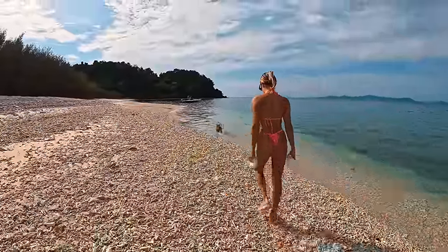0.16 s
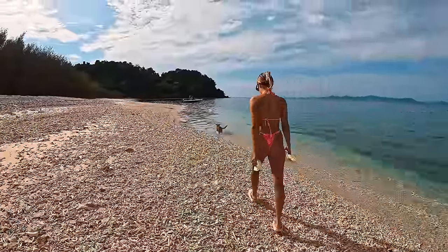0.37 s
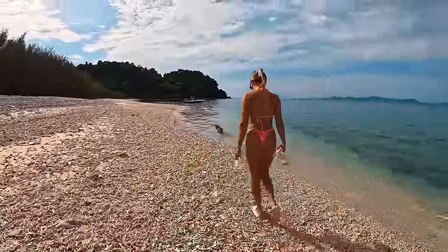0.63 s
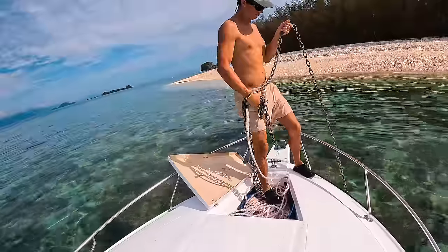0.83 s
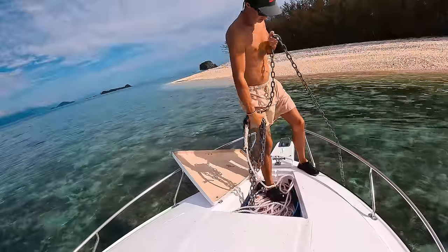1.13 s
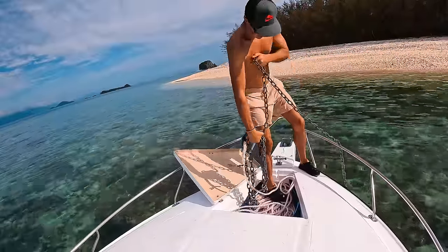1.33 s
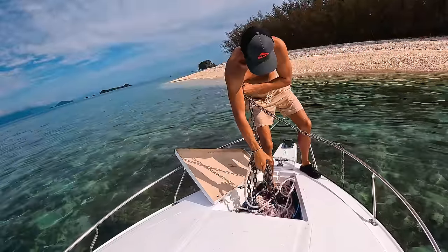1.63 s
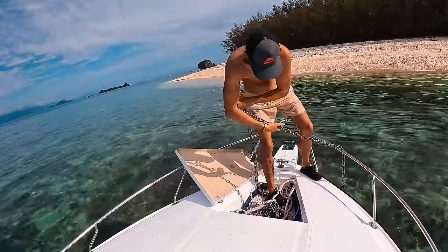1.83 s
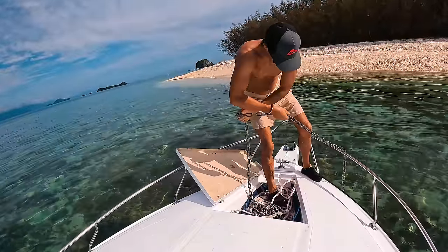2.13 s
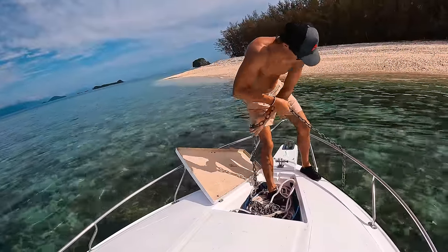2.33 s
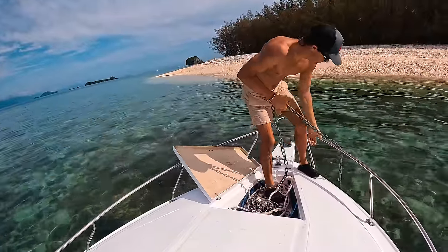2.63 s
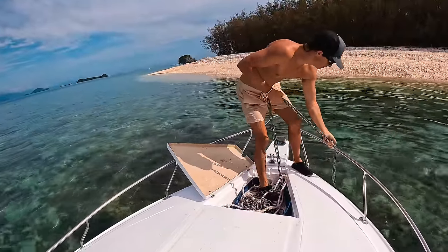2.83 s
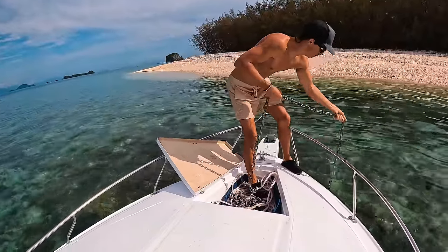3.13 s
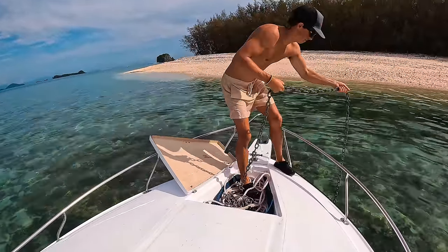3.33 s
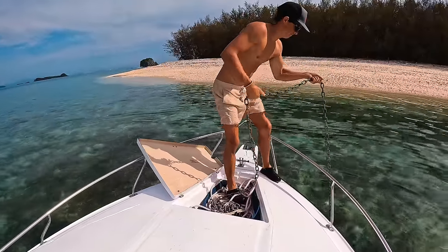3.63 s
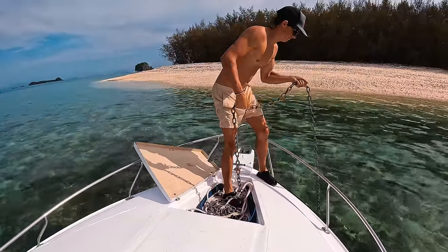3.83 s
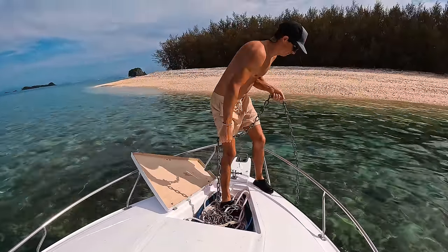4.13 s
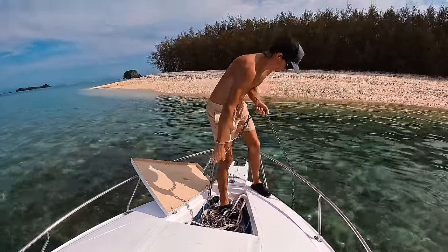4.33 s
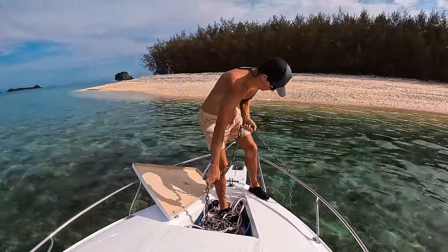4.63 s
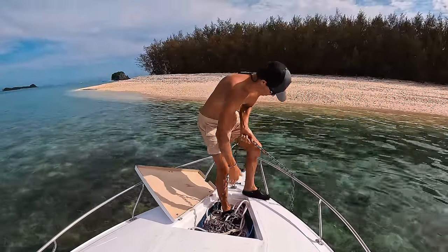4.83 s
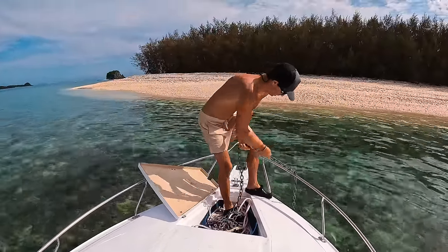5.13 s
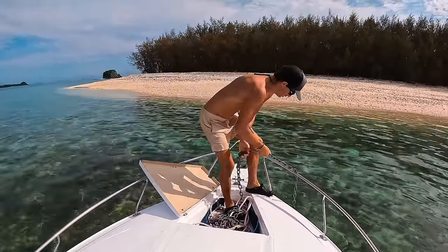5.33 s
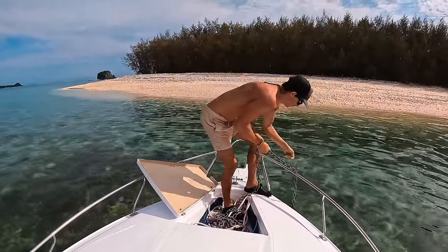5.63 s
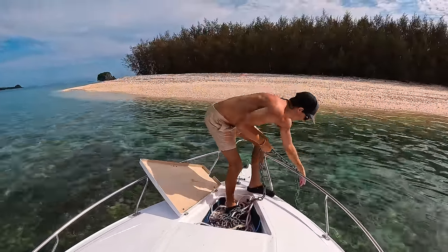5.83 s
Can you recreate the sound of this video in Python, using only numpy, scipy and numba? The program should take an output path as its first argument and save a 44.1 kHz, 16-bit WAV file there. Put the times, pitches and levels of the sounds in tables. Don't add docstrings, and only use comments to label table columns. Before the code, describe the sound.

Soft steps crunch on a pebble beach with small waves, cut by a tiny silence. Then, close by on a boat, a steel chain clinks, pours in a dense rattle around two seconds and knocks into the well. Sparser clinks follow, then set-down knocks, squeaking soles and another pull ending in hard deck blows. Water laps and wind bumps one small, nearly mono microphone outdoors.

```python
import sys
import numpy as np
from scipy import signal
from scipy.fft import rfft, irfft
from scipy.io import wavfile
from scipy.ndimage import uniform_filter1d, minimum_filter1d
from numba import njit

SR = 44100
rng = np.random.default_rng(int(sys.argv[2]) if len(sys.argv) > 2 else 0)


def invert_db(x):
    u = np.asarray(x, float) / 20
    return 10 ** u


def wav_out(sig):
    wavfile.write(sys.argv[1], SR, np.round(np.clip(np.atleast_2d(sig).T, -1, 1) * 32767).astype(np.int16))


N = 263628
T = np.arange(N) / SR
CUT_S, BACK_S, FADE_S = .769, 0.841, 0.097

# [f/Hz, level/dB per Hz]
SHORE_COLOUR = [(24, -37), (40, -7), (71, -12), (133, -18.5), (674, -20), (3590, -25), (5360, -34),
                (8620, -29), (15700, -51)]
# [f/Hz, level/dB per Hz]
WATER_COLOUR = [(40, 0), (60, -8.5), (100, -16.5), (250, -20.5), (500, -11.5), (1200, -11.5), (2300, -15.5),
                (5000, -23.5), (10000, -29.5), (15700, -37)]
# [start t/s, hold t/s, level/dB over calm water]
LAPS = [
    (.85, 0.012, 10.5),
    (1.1, .05, 0.4),
    (2.5, .15, 2),
    (3.62, .12, 4),
    (5, 0.06, 4.5),
    (5.4, .1, 2.5),
]
# [start t/s, hold t/s, heave level/dB, rumble level/dB]
GUSTS = [
    (0, .02, -28, -45),
    (0.496, 0.024, -21, -58),
    (1.864, .02, -28, -32.5),
    (3.25, .02, -20, -38),
    (3.31, 0.03, -16.5, -37),
    (3.489, .02, -24, -57),
    (4.228, 0.017, -30.5, -44.5),
    (4.698, 0.016, -28, -48),
]
# [start t/s, hold t/s, low crunch level/dB, high crunch level/dB]
STEPS = [
    (0, .01, -49, -54),
    (0.281, .01, -47.5, -48),
    (0.364, .01, -43.5, -46),
    (0.445, 0.0093, -44.5, -42),
    (0.56, 0.028, -48.5, -48.5),
    (0.757, .008, -48, -53),
]
# [t/s, peak level/dB, f/Hz]
PEBBLES = [
    (0.2732, -45, 7160),
    (0.3066, -21, 15100),
    (0.3545, -49, 8660),
    (0.3679, -30, 10000),
    (0.5585, -30.5, 7070),
    (0.6763, -35, 12500),
    (0.757, -28, 1170),
    (0.759, -32, 1950),
]

# [start t/s, length t/s, from f/Hz, to f/Hz, level/dB]
SQUEAKS = [(4.63, .012, 1590, 2600, -52), (4.685, .018, 2350, 2700, -44), (4.69, .03, 1500, 1550, -47),
           (4.74, .016, 1550, 1700, -47), (4.695, .03, 5600, 5400, -50), (4.638, .021, 5300, 5270, -40),
           (4.657, .013, 5300, 7600, -42), (4.64, .016, 2600, 2780, -48), (4.654, .013, 2750, 3150, -36),
           (4.667, .016, 2950, 3400, -39), (4.665, .014, 5700, 7000, -47), (4.71, .045, 3430, 3800, -44),
           (4.722, .017, 3950, 4480, -43), (4.734, .019, 4480, 3950, -42), (4.749, .018, 3950, 3900, -39),
           (4.695, .03, 6400, 7200, -47), (4.788, .038, 3780, 2880, -40), (4.82, .021, 2900, 2950, -43),
           (4.836, .027, 3180, 2500, -39), (4.85, .03, 2450, 1700, -37), (4.672, .014, 2250, 2350, -45),
           (4.712, .016, 1800, 2040, -41), (4.725, .03, 1650, 1750, -44), (4.772, .026, 2500, 2450, -42),
           (4.775, .024, 2100, 2100, -42), (4.822, .016, 5800, 5900, -45), (4.842, .014, 6100, 5600, -44),
           (4.825, .02, 1750, 1700, -48), (5.09, 0.035, 1500, 1750, -50), (5.128, 0.028, 2000, 1800, -44),
           (5.145, .027, 1600, 1580, -47), (5.093, .05, 2450, 2450, -52), (5.12, .016, 5050, 5100, -48),
           (5.16, .03, 3200, 3300, -51)]
# [start t/s, hold t/s, level/dB]
SCUFFS = [
    (4.665, 0.2, -39),
    (5.095, 0.03, -43),
    (5.115, 0.04, -37),
    (5.16, .02, -52),
]

# [t/s, peak level/dB]
BRUSHES = [(4.123, -46), (4.16, -48), (5.041, -42), (5.062, -42), (5.099, -44), (5.176, -42), (5.185, -42),
           (5.201, -44), (5.215, -41), (5.223, -43), (5.232, -42), (5.503, -42), (5.546, -45), (5.641, -47)]
# [f/Hz, level/dB per Hz]
BRUSH_COLOUR = [(1200, -20), (2200, -3), (4500, 0), (8000, -4), (11000, -10), (15500, -20)]

# [t/s, peak level/dB, centre f/Hz, t60 t/s]
WELL = [(2.1008, -24.5, 2310, 0.066), (2.1978, -5.5, 1563, 0.021), (2.2167, -17, 1540, 0.021),
        (2.2271, -13.5, 1540, 0.011), (2.2379, -27, 1550, 0.014), (2.2522, -30.5, 1010, 0.073),
        (2.2869, -11.5, 1650, 0.021), (2.3441, -13.5, 1613, 0.017), (2.9648, -36, 1240, 0.05),
        (2.98, -35, 1960, 0.06), (4.057, -17, 3720, 0.014), (4.2682, -26.5, 1250, 0.081)]
# [t/s, peak level/dB, centre f/Hz, t60 t/s]
BLOWS = [(0.8928, -24.5, 1160, 0.082), (4.0397, -11.5, 3010, 0.031), (4.047, -17.5, 2030, .035),
         (5.5778, -34, 1920, 0.092), (5.7219, -4, 1854, .027), (5.736, -16, 1680, 0.016),
         (5.7495, -9.5, 1300, 0.029), (5.7939, -11.5, 2420, 0.019), (5.8005, -16, 1990, 0.039),
         (5.82, -29, 1900, 0.03), (5.825, -25, 1290, 0.034), (5.835, -30, 1900, 0.03),
         (5.855, -32, 1900, 0.03)]
# [t/s, peak level/dB]
TAPS = [(2.8932, -37), (3.6592, -34), (3.675, -29), (3.6931, -26), (4.962, -34), (5.6306, -35),
        (5.659, -35), (5.6746, -35), (5.6953, -34), (5.8452, -31), (5.881, -33), (5.91, -35.5),
        (5.9494, -34.5)]
# [t/s, peak level/dB, t60 t/s]
THUDS = [
    (1.853, -35, 0.079),
    (1.871, -36, 0.035),
    (1.895, -50, 0.037),
    (2.971, -47, 0.13),
    (4.038, -34, 0.18),
    (4.54, -43, 0.15),
    (5.723, -42, 0.2),
]
# [f/Hz, level/dB per Hz]
SLAP_COLOUR = [(250, -12), (650, -3), (1800, 2.5), (4000, -4.5), (5500, -11), (7400, -15.5), (11000, -23),
               (15000, -36)]
# [f/Hz, level/dB, t60 t/s]
PANEL = [(940, -11, .035), (1170, -13, .03), (1520, -12, .025), (1740, -11, .022), (1940, -13, .03),
         (2470, -8.5, .025), (2900, -9, .02), (3500, -7.5, .022), (4050, -9, .02), (4900, -13, .018),
         (5750, -17, .018), (6200, -21, .022)]
# [f/Hz, level/dB, t60 t/s]
HULL = [(133, -2, 0.32), (173.3, 1.5, 0.085), (254, -1, 0.13), (332.7, -3.5, 0.21), (482, -2, 0.077)]
# [t/s, f/Hz, peak level/dB, t60 t/s]
STRUCK_RINGS = [(.893, 6800, -50.5, 0.28), (4.04, 6650, -38, 0.3), (4.05, 6705, -43, .25), (2.198, 860, -20, .025),
                (2.198, 3400, -18, .022), (2.965, 1250, -39, .05), (2.978, 620, -38, .04), (5.7497, 5750, -19, .02),
                (5.7497, 4950, -22, .025), (5.7222, 3950, -17, .02), (4.041, 3000, -21, .03),
                (4.175, 684, -27, .04), (4.539, 555, -28, .025), (4.041, 380, -24, .04), (.855, 3000, -46, .12),
                (3.24, 73, -24, .12)]
# [start t/s, hold t/s, level/dB]
MURMURS = [
    (1.83, 0.05, -37),
    (2.216, 0.06, -39),
    (2.98, .03, -51.5),
    (4.085, .03, -43),
    (4.67, 0.014, -47),
    (5.547, 0.09, -49),
]
# [f/Hz, level/dB per Hz]
HOLLOW_COLOUR = [(80, -14), (110, -0.5), (140, 0), (190, -4.5), (300, -9.5), (500, -17), (900, -20)]

# [t/s, ring peak level/dB, tick
# minus ring level/dB]
CLINKS = [(0.8715, -44, -3), (0.8885, -36, -2), (0.9665, -37, -2), (1.1128, -38, -11), (1.1712, -28, -14),
          (1.2126, -24, -17), (1.2181, -26, -12), (1.246, -21, -19), (1.263, -36, -1), (1.3004, -33, -7),
          (1.3163, -23, -19), (1.3468, -27, -12), (1.3555, -26, -16), (1.3682, -20, -13),
          (1.3832, -16, -16), (1.391, -10, -26), (1.4011, -23, -10), (1.407, -16, -27), (1.4116, -15, -17),
          (1.422, -22, -26), (1.431, -23, -24), (1.441, -19, -18), (1.4455, -16, -19), (1.455, -26, -10),
          (1.461, -27, -13), (1.477, -24, -22), (1.51, -28, -11), (1.5199, -14, -21), (1.5264, -13, -20),
          (1.532, -21, -25), (1.541, -27, -24), (1.5513, -31, -6), (1.566, -21, -18), (1.58, -29, -19),
          (1.6301, -23, -17), (1.6394, -17, -24), (1.644, -22, -17),
          (1.67, -26, -14), (1.682, -16, -20), (1.6888, -14, -19), (1.7089, -12, -20), (1.7162, -12, -27),
           (1.7299, -6, -22), (1.7345, -7, -21), (1.7651, -5, -25), (1.779, -9, -28), (1.7953, -11, -13),
           (1.811, -8, -17), (1.8279, -9, -28), (1.8387, -6, -19), (1.8564, -3, -23), (1.871, -8, -17),
           (1.879, -15, -19), (1.8923, -11, -21), (1.909, -11, -28), (1.916, -18, -28), (1.9926, -22, -24),
           (2.0613, -36, -9), (2.1, -43, 6), (2.186, -27, -15), (2.2088, -19, -28), (2.2504, -35, -7),
           (2.289, -23, -14), (2.3267, -22, -16),
          (2.445, -34, -12), (2.46, -38, -8), (2.4814, -27, -17), (2.497, -39, -8), (2.5173, -35, -11),
           (2.5281, -22, -24), (2.54, -38, -12), (2.5825, -21, -17), (2.62, -16, -18), (2.6739, -26, -22),
           (2.6989, -36, -10), (2.7527, -31, -12), (2.8143, -33, -13), (2.8216, -29, -10),
           (2.854, -32, -20), (2.876, -40, -8), (3.0481, -41, -6), (3.1309, -42, -1), (3.2007, -23, -14),
           (3.2756, -36, -12), (3.3135, -32, -13), (3.3178, -33, -24), (3.3509, -34, -12),
           (3.3723, -34, -14), (3.4077, -33, -11), (3.495, -35, -4), (3.5474, -39, -11), (3.5769, -24, -19),
           (3.8373, -48, 1),
          (3.9407, -22, -19), (3.9617, -22, -14), (3.9677, -18, -19), (3.978, -23, -20),
            (4.076, -20, -14), (4.1304, -37, -15), (4.2222, -33, -13), (4.2321, -29, -9),
            (4.2452, -23, -20), (4.2924, -14, -12), (4.325, -21, -18), (4.3413, -19, -14),
            (4.3501, -15, -23), (4.4062, -22, -22), (4.4526, -26, -10), (4.4995, -35, -6),
            (4.5279, -38, -7), (4.5459, -16, -27), (4.5933, -20, -16), (4.6252, -30, -10),
          (4.7582, -26, -16), (4.8006, -19, -15), (4.826, -24, -20), (4.851, -22, -20), (4.9629, -13, -12),
           (4.9756, -9, -27), (4.983, -12, -38), (4.9918, -18, -12), (5.0288, -30, -13), (4.999, -16, -22),
           (5.0477, -21, -16), (5.06, -36, -6), (5.0886, -41, -2), (5.2972, -40, -9), (5.3156, -33, -9),
           (5.373, -24, -17), (5.3777, -18, -31), (5.3866, -21, -20), (5.3979, -32, -2), (5.4104, -23, -12),
           (5.4323, -19, -11), (5.4583, -15, -17), (5.49, -31, -7), (5.5241, -20, -16), (5.5551, -31, -12),
           (5.5725, -21, -20), (5.6639, -38, -19), (5.7266, -9, -18), (5.736, -18, -16), (5.7497, -10, -10),
           (5.769, -11, -33), (5.776, -20, -15), (5.7982, -19, -17), (5.817, -28, -12)]
# [t/s, ring peak level/dB, tick minus ring level/dB]
JOLTS = [
    (4.04, -20, 3),
    (4.2709, -24, -4),
    (2.1965, -34, 6),
]
# [t/s, ring peak level/dB, tick minus ring level/dB]
CHOKED = [
    (4.8362, -13, -26),
    (5.2408, -31, -11),
    (5.4773, -6, -23),
    (4.3184, -13, -15),
]
# [start t/s, hold t/s, ring level/dB, dry patter minus ring level/dB]
SWINGS = [(1.177, 0.14, -42.5, -14), (1.376, 0.09, -31, -20), (1.515, 0.025, -32, -20),
          (1.645, .04, -31, -19), (1.705, .02, -26, -20), (1.735, 0.065, -18.5, -23),
          (1.82, 0.05, -17.5, -19), (1.87, 0.025, -19, -21), (1.92, 0.07, -28, -24), (2.223, .11, -35, -22),
          (2.482, 0.018, -38.5, -17), (2.708, .16, -55, -14), (3.975, 0.0073, -38, -18),
          (4.05, 0.025, -38, -9), (4.297, 0.055, -28, -18), (4.555, 0.08, -35, -18),
          (4.816, 0.016, -31.5, -14), (4.975, 0.025, -28, -15), (5.4, 0.06, -29, -21),
          (5.755, 0.04, -28, -22)]
# [f/Hz, spread between links f/Hz, level/dB, t60 t/s]
LINK = [(11670, 85, 0, .085), (12225, 60, -4.5, .08), (12505, 50, -8, .065)]
# [f/Hz, level/dB per Hz]
TICK_COLOUR = [(1200, -55), (2000, -17), (4350, -11), (8400, -5.5), (11000, 0), (12800, -13), (13500, -5.5),
               (15800, -19)]

# [low f/Hz, high f/Hz]
TREBLE_BANDS = [(12800, 13700), (13700, 14800), (14800, 17000)]


def noise(spectrum):
    hz, db = np.transpose(spectrum)
    log_hz = np.log(np.arange(1, N // 2 + 2) * SR / N)
    colour = invert_db(np.interp(log_hz, np.log(hz), db, -90, -90))
    x = irfft(rfft(rng.standard_normal(N)) * colour, N)
    return x / np.std(x)


def walk(rate):
    k = int(SR / rate)
    held = np.repeat(rng.standard_normal(N // k + 1), k)
    return 2.93 * uniform_filter1d(held, k)[:N]


def swells(s, hold, db, rise_db_s, fall_db_s, rest_db):
    early = np.clip(s[:, None] - T, 0, None)
    late = np.clip(T - (s + hold)[:, None], 0, None)
    level = db[:, None] - rise_db_s * early - fall_db_s * late
    return np.maximum(rest_db, np.max(level, axis=0))


@njit
def ring(s, hz, size, t60, phase, contact_s):
    out, push = np.zeros(N), np.exp(-1 / (contact_s * SR))
    for k in range(len(s)):
        turn = np.exp(2j * np.pi * hz[k] / SR - np.log(1000) / (t60[k] * SR))
        z, start, left = size[k] * np.exp(1j * phase[k]), int(s[k] * SR), 1.
        for i in range(start, min(N, start + int(t60[k] * SR))):
            left *= push
            out[i] += z.imag * (1 - left)
            z *= turn
    return out


def strike(s, hz, db, t60, contact_s, phase=0):
    same = 0.0 * s
    return ring(s, hz + same, invert_db(db + same), t60 + same, phase + same, contact_s)


def bursts(s, db, t60, contact_s=0.000067):
    return strike(s, 0, db, t60, contact_s, phase=np.pi / 2)


def shower(count, scatter_db):
    return rng.uniform(0, T[-1], count), scatter_db * (rng.exponential(size=count) - 1)


def wind():
    s, hold, heave_db, rumble_db = np.transpose(GUSTS)
    heave_db = swells(s, hold, heave_db, 76, 42.5, rest_db=-37)
    rumble_db = swells(s, 0 * s, rumble_db, 100, 70, rest_db=-54.5)
    heave = noise([(3, -3.5), (6, 0), (12, 0.5), (19, -2), (26, -23.5)])
    rumble = noise([(22, 2), (30, 4.5), (50, -5.5), (90, -7.0), (150, -14.5)])
    return invert_db(heave_db) * heave + invert_db(rumble_db) * rumble


def water():
    lap = invert_db(-49 - 6.5 + swells(*np.transpose(LAPS), 9.4, 26, 0))
    slow = invert_db(0.25 * walk(9)) * noise(WATER_COLOUR)
    fast = invert_db(1.2 * walk(25) - 2.2) * noise(WATER_COLOUR)
    return lap * (slow + fast)


def beach():
    s, hold, low_db, high_db = np.transpose(STEPS)
    low_db = swells(s, hold, low_db, 120, 81, -55.5)
    high_db = swells(s, hold, high_db, 250, 113, -59.5)
    grains = bursts(*shower(count=9000, scatter_db=3.5), 0.016)
    grains = grains / np.std(grains) * 0.4
    low = invert_db(low_db) * noise([(200, 0.5), (600, 1.5), (2000, -3.5), (5000, -19)])
    high = invert_db(high_db) * noise([(3000, -12), (7000, -6.0), (15700, -11)])
    s, db, hz = np.transpose(PEBBLES)
    pebbles = strike(s, hz, db - 7.5, t60=0.036, contact_s=0.00031)
    return grains * (low + high) + pebbles + invert_db(-52) * noise(SHORE_COLOUR)


def squeaks():
    out, waver, flutter = np.zeros(N), walk(150), walk(500)
    for k, (start, length, from_hz, to_hz, db) in enumerate(SQUEAKS):
        i = np.arange(int(start * SR), int((start + length) * SR))
        u = (T[i] - start) / length
        own = i - 4000 * k
        hz = (from_hz + (to_hz - from_hz) * u) * (1 + 0.006 * waver[own])
        phase = 2 * np.pi * np.cumsum(hz) / SR
        tone = np.sin(phase) + invert_db(-10.5) * (np.sin(2 * phase) + 0.66 * np.sin(3 * phase))
        chatter = np.clip((2500 - from_hz) / 900, .15, .8) * flutter[own]
        out[i] += invert_db(db) * (1 + chatter) * np.abs(np.sin(np.pi * u)) ** .5 * tone
    return out


def soles():
    db = swells(*np.transpose(SCUFFS), 800, 260, -71)
    s, size_db = shower(count=5000, scatter_db=2.5)
    rib_hz = 1400 * np.exp(rng.uniform(0, 1.7, len(s)))
    ribs = strike(s, rib_hz, size_db + np.interp(s, T, db) - 7, t60=0.022, contact_s=0.0017)
    rasp = noise([(1000, -7), (1500, 2.0), (4000, -2.0), (9000, -6), (15500, -24)])
    return squeaks() + ribs + invert_db(db - 5 + 0.72 * walk(120)) * rasp


def brushes():
    s, db = np.transpose(BRUSHES + [(s, db - 13) for s, db in TAPS])
    return bursts(s, db, .03, contact_s=.0012) * noise(BRUSH_COLOUR)


def hull():
    thuds = bursts(*np.transpose(THUDS))
    thuds = thuds * noise([(60, 0.0), (150, -5), (400, -2.5), (900, -11.5), (2500, -28.5)])
    s, hz, db, t60 = np.transpose(STRUCK_RINGS)
    struck = strike(s, hz, db, t60, contact_s=0.0016)
    murmur_db = swells(*np.transpose(MURMURS), 130, 138.5, -55.5) + 1.3 * walk(30)
    return thuds + struck + invert_db(murmur_db) * noise(HOLLOW_COLOUR)


def deck():
    taps = [(s, db, 1655, 0.021) for s, db in TAPS]
    s, db, hz, t60 = np.transpose(WELL + BLOWS + taps)
    boom_db = np.repeat([-33, -43, -50.5], [len(WELL), len(BLOWS), len(taps)])
    boom_db = boom_db + .6 * np.minimum(db + 25, 0)
    t60 = np.clip(t60, .008, .15)
    out = bursts(s, db - 8.0, t60) * noise(SLAP_COLOUR)
    out = out + bursts(s, db - 22.5, 4 * t60) * noise(SLAP_COLOUR)
    out = out + strike(s, hz, db - 8.0, t60=.018, contact_s=0.000098)
    out = out + strike(s, 2.2 * hz, db - 15, t60=.018, contact_s=0.00021)
    for mode_hz, mode_db, mode_t60 in PANEL:
        tune, force, phase = rng.standard_normal((3, len(s)))
        level_db = db + mode_db - 10 + 3.0 * force
        out = out + strike(s, mode_hz * (1 + 0.015 * tune), level_db, mode_t60, 0.00015, phase)
    for mode_hz, mode_db, mode_t60 in HULL:
        tune, force = rng.standard_normal((2, len(s)))
        level_db = boom_db + mode_db - 3.5 + 1.8 * force
        out = out + strike(s, mode_hz * (1 + 0.096 * tune), level_db, mode_t60, 0.0027)
    return out + hull()


def links(s, db, damp, count):
    out = 0
    for hz, spread_hz, mode_db, t60 in LINK * count:
        tune, force, decay, phase = rng.standard_normal((4, len(s)))
        own_hz = hz + spread_hz * tune
        own_t60 = damp * t60 * np.exp(0.54 * decay)
        out = out + strike(s, own_hz, db + mode_db + 1.8 * force, own_t60, .0009, np.pi * phase)
    return out


def clinks(blows, damp):
    s, db, tick_db = np.transpose(blows)
    ticks = bursts(s, db + tick_db + 1.5, 0.016) * noise(TICK_COLOUR)
    return links(s, db - 7.0, damp, count=3) + ticks


def rattle():
    s, hold, db, dry_db = np.transpose(SWINGS)
    ring_db = swells(s, hold, db, 400, 332, -76)
    patter_db = swells(s, hold, db + dry_db, 210, 230, -84)
    s, db = shower(count=4200, scatter_db=2.0)
    rings = links(s, db - 3.5 + np.interp(s, T, ring_db), 0.55, count=1)
    s, db = shower(count=6000, scatter_db=2.5)
    pouring_db = -22
    crowd = np.clip(invert_db(np.interp(s, T, ring_db) - pouring_db), .3, 1)
    touch = rng.random(len(s)) < crowd
    grains = bursts(s[touch], (db - 11 * np.log10(crowd))[touch], 0.026)
    hiss = np.clip(invert_db(ring_db - pouring_db), .3, .8)
    patter = .6 * grains + 1.8 * hiss
    return rings + patter * invert_db(patter_db - 5.5) * noise(TICK_COLOUR)


def chain():
    free = clinks(CLINKS + JOLTS, damp=0.78)
    return free + clinks(CHOKED, damp=.3) + rattle()


def scene():
    gusts = wind()
    first = beach() + gusts * np.clip((CUT_S - T) / 0.094, 0, 1)
    first = first * np.clip((CUT_S - T) / 0.0018, 0, 1)
    drift = -0.24 * np.exp(-(T - 1))
    fade = np.clip((T - BACK_S) / FADE_S, 0, 1) ** 1.05
    boat = chain() + brushes() + deck() + soles() + water() + gusts + drift
    mid = first + boat * fade
    return mid + np.array([[-1], [1]]) * 0.024 * drift * fade


def band(x, low_hz, high_hz):
    return signal.sosfiltfilt(signal.butter(4, [low_hz, high_hz], "band", fs=SR, output="sos"), x)


def frame_level(x):
    power = np.add.reduceat(x ** 2, np.arange(0, N, 1024)) / 1024
    return 10 * np.log10(np.repeat(power, 1024)[:N] + 1e-14)


def limit(x):
    need = np.minimum(1, .8 / (np.abs(x) + 1e-9))
    return uniform_filter1d(minimum_filter1d(need, size=257), size=129)


def top_cut(x):
    return signal.sosfilt(signal.butter(12, 16460, fs=SR, output="sos"), x)


def record(dry):
    ringing_db = frame_level(band(dry[0], 11300, 12700))
    for (low_hz, high_hz), gate_db in zip(TREBLE_BANDS, [-65, -63, -62]):
        top = band(dry[0], low_hz, high_hz)
        lost = frame_level(top) < np.minimum(gate_db, ringing_db - 12)
        dry = dry - top * uniform_filter1d(1. * lost, size=256) * (T > CUT_S)
    side = 0
    for low_hz, high_hz, db in [(40, 440, -22), (350, 1080, -21), (1000, 5600, -20),
                                (4500, 10500, -23), (10500, 13000, -34)]:
        patches = np.clip(walk(30) - 1.1, 0, 1)
        side = side + invert_db(db) * np.roll(band(dry[0], low_hz, high_hz), 40) * patches
    wide = (dry + np.array([side, -side])) * limit(dry[0])
    low_pass = signal.ellip(8, .2, 70, 15900, fs=SR, output="sos")
    return top_cut(signal.sosfilt(low_pass, wide))


dry = scene()
out = record(dry)
wav_out(out)
```